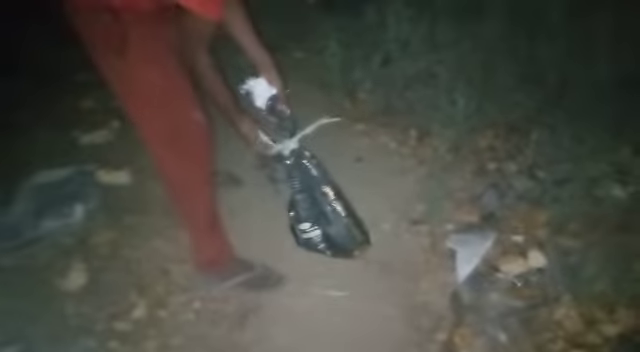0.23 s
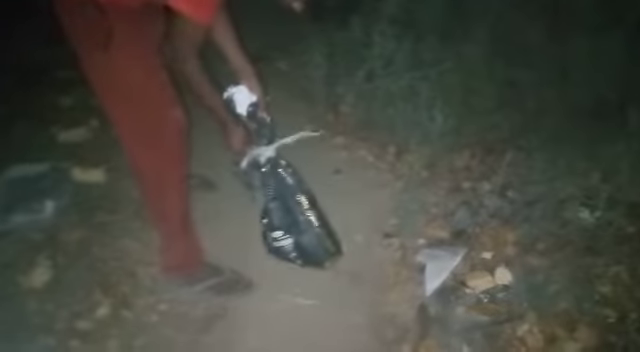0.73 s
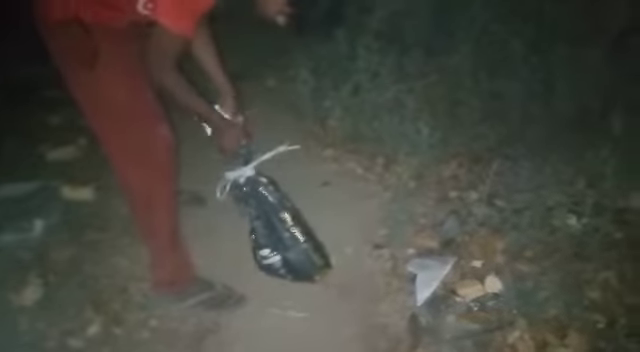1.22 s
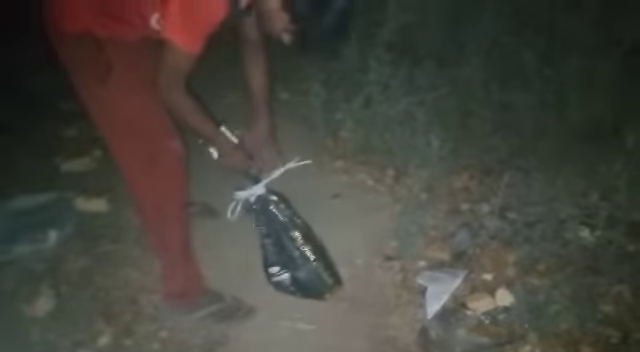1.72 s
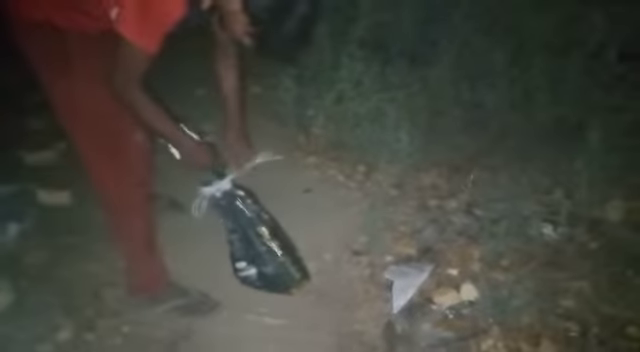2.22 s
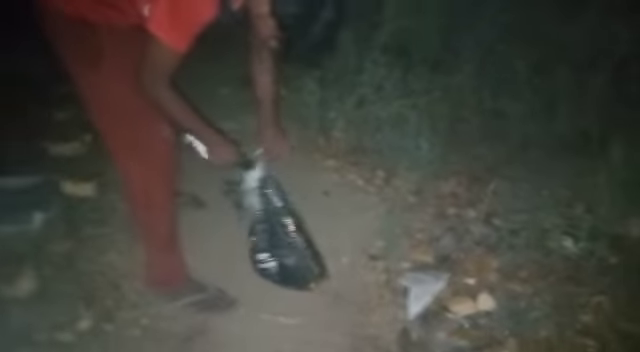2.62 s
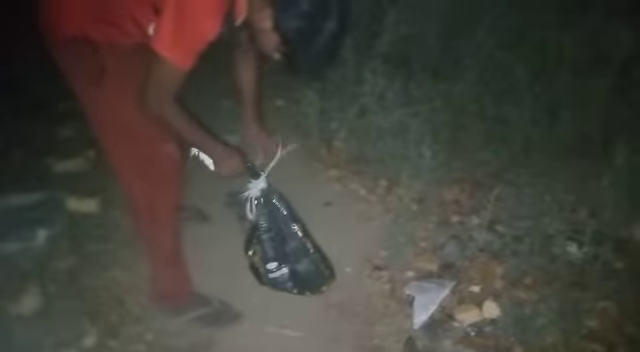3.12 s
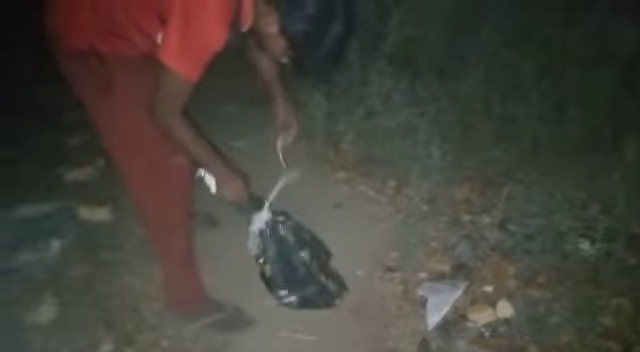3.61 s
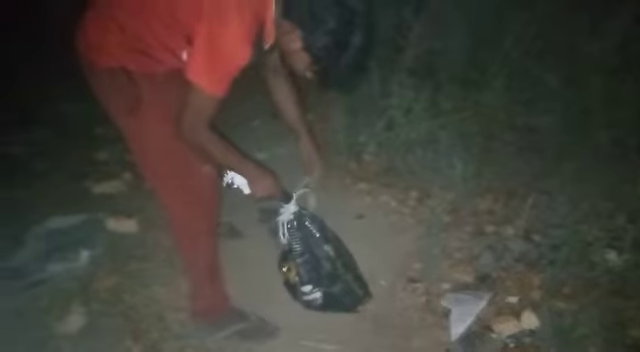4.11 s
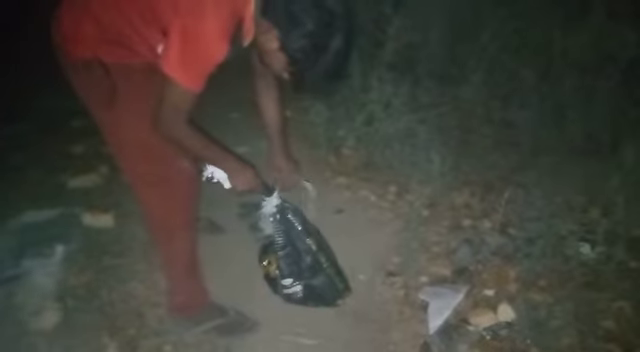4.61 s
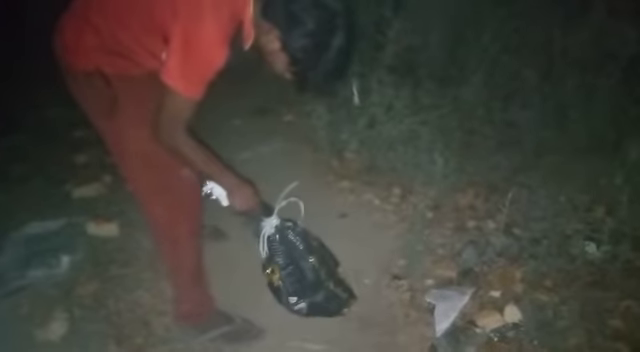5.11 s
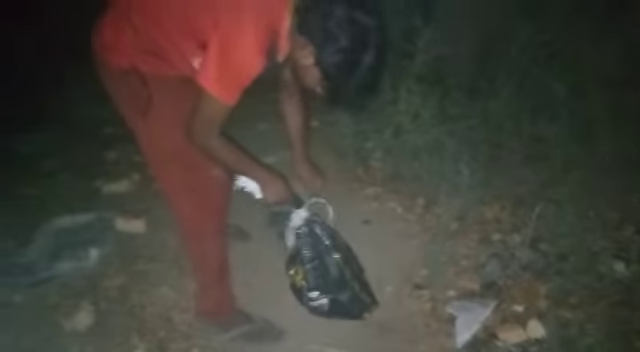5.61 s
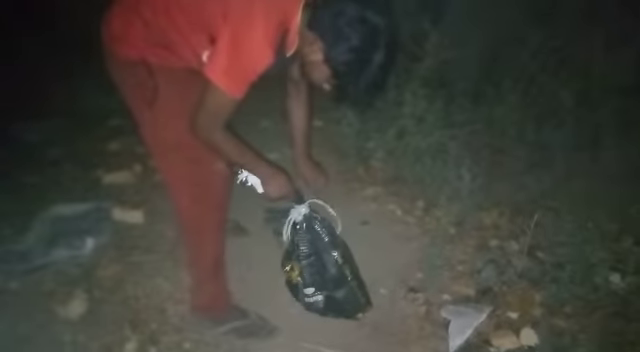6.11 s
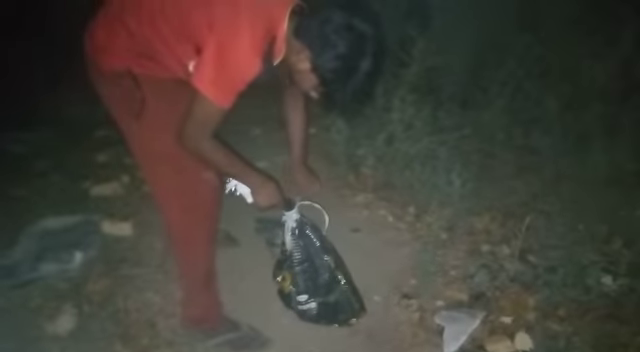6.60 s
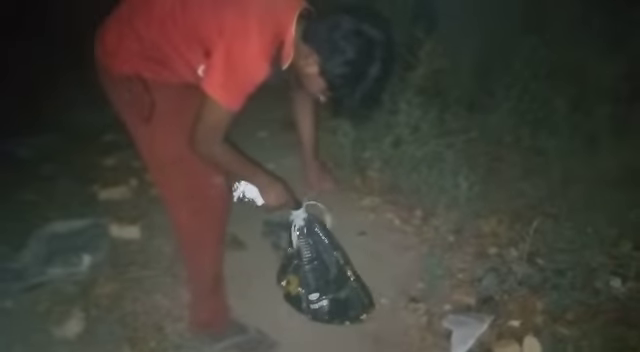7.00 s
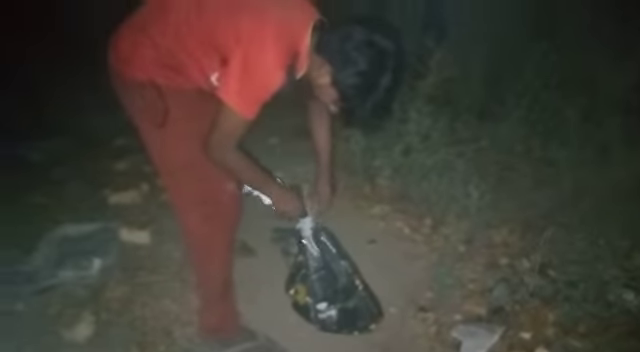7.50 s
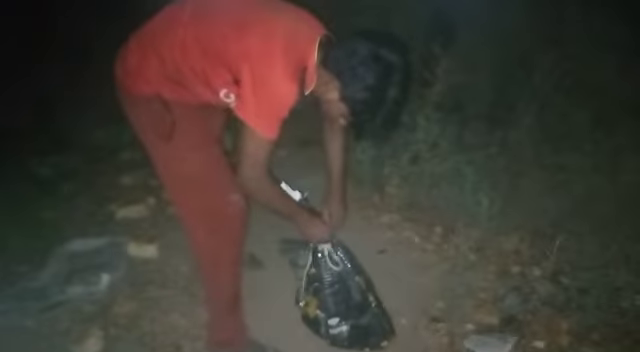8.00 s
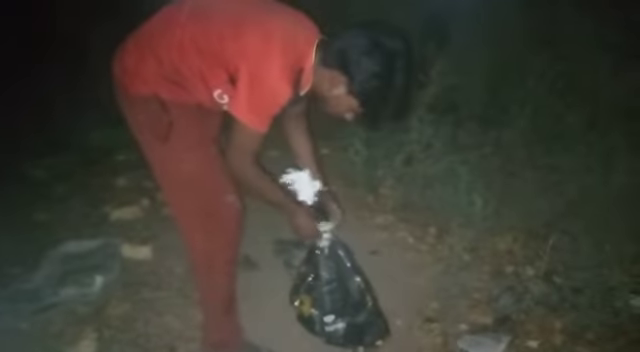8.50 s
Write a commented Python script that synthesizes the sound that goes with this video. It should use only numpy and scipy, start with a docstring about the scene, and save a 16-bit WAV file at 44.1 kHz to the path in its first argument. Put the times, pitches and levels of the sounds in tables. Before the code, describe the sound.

Crickets chirp and trill in high tones throughout, outdoors at night, over a faint distant rumble. Close to the microphone, hands lightly crinkle a plastic bag, then twist and tie it harder, with sharp snaps and soft knocks from the contents. A single tap thuds on the microphone. The bag goes nearly quiet, leaving the insects, before the crinkling returns near the end.

```python
"""Night in a yard: crickets chip, sweep and trill with their wings throughout, over a far low rumble.
Close by, hands start on a plastic bag, and its film crinkles in short, light moves.
From 2.6 s they twist and tie it harder: folds snap, the load slides and knocks, and near 4 s
a tap on the microphone thuds. After 5 s the bag all but rests and the crickets come forward;
from 6.7 s the crinkling and snapping return until the end."""
import sys
import numpy as np
from scipy import signal
from scipy.fft import rfft, irfft
from scipy.io import wavfile
from scipy.ndimage import uniform_filter1d

SR = 44100
rng = np.random.default_rng(int(sys.argv[2]) if len(sys.argv) > 2 else 0)


def put_to_file(sound):
    """Save the sound as 16-bit audio at rate SR, in the file named by the first command-line argument."""
    columns = np.atleast_2d(sound).T  # one column per channel
    safe = np.clip(columns, -1, 1)
    whole_steps = np.round(safe * 32767)
    wavfile.write(sys.argv[1], SR, whole_steps.astype(np.int16))


N = 386316

# Moves of the hands on the film. Each row: start in seconds, length in seconds,
# level of the folds in dB, fine crackle against the folds in dB.
MOVES = [(-0.09, 0.14, -40, -23), (0.09, 0.061, -57.5, -3), (0.286, 0.076, -66, -3), (0.385, 0.1, -57, -4),
         (0.545, 0.089, -59, -3), (0.649, 0.14, -58.5, -5), (1.125, 0.074, -60, 1),
         (1.308, 0.096, -51.5, -11), (1.417, 0.043, -53, -16), (1.453, 0.12, -54, -20),
         (2.565, .148, -55, -7), (2.736, 0.14, -54, -16), (3.059, 0.063, -49.5, -9.5),
         (3.416, 0.063, -63, -4), (3.505, 0.17, -49.5, -7), (3.634, 0.16, -54, -18), (3.846, 0.12, -58, -3),
         (4.253, 0.02, -58, -18), (4.607, 0.012, -51.5, 3), (4.77, 0.087, -51, -10),
         (4.848, 0.064, -37, -7.5), (4.944, 0.031, -51.5, -15), (5.42, 0.079, -65, -9),
         (6.668, 0.25, -63.5, -5), (7.046, 0.053, -57.5, -8), (7.3, .06, -65, -8), (7.386, 0.077, -56, -6),
         (7.54, .1, -60.5, -12), (7.928, 0.1, -51.5, -9), (8.06, .15, -62, -8), (8.239, 0.13, -44, -8),
         (8.363, 0.16, -59, -6), (8.512, 0.22, -53, -10)]


def crinkle():
    """Thousands of tiny buckles in the film: fine crackle on top, broad folds below, stray ticks."""
    # Tone of the crackle and of the folds. Each row: frequency in Hz, relative level in dB.
    crackle_eq = [(6000, -38), (9000, 16.5), (11700, 9.5), (13600, -6), (15000, 10.5), (15900, 3)]
    folds_eq = [(400, -21), (900, -9), (1700, -8.5), (2200, -15), (3300, -7), (4300, -0.5), (5600, 7),
                (6800, 1), (8200, -15.5)]
    follow = 0.57  # below 1, so sparks and ticks stand out most in gentle moves
    buckles = []
    for _ in range(2):
        dense = evened(clicks(12000, 1.3)) * amp(2 * drift(70))
        buckles.append(dense + .35 * evened(clicks(300, 2.2)))
    grip = evened(amp(2.5 * np.tanh(drift(45))))  # the grip slips and catches
    sparks = evened(clicks(78, 2.5))
    fold_gain = handling(MOVES)
    crackle_gain = handling([(start, length, db + crisp_db) for start, length, db, crisp_db in MOVES])
    # each small panel of film rings at its own pitch for a moment
    crackle = patchy(coloured(buckles[0] + .5 * buckles[1], crackle_eq), 4.8, size=256)
    folds = patchy(coloured(buckles[1], folds_eq), 4.04, size=512)
    out = grip * (crackle * crackle_gain + folds * fold_gain)
    out += amp(-36) * coloured(sparks, crackle_eq) * crackle_gain ** follow
    for hz in (2300, 4300, 6300):
        ticks = clicks(40, 2.8) * fold_gain ** follow
        out += amp(-27) * signal.oaconvolve(ticks, snap(hz))[:N]
    return out


def snaps():
    """Accents in the film: folds flip over and lone buckles spit bright clicks."""
    # Flipping folds. Each row: start in seconds, peak in dB, pitch of the fold in Hz.
    flips = [(0.6789, -32, 5600), (2.0143, -35, 5960), (2.6002, -38, 5240), (2.6232, -29.5, 5600),
             (2.6954, -32, 5200), (2.754, -22, 4200), (3.6794, -29, 6160), (3.699, -22.5, 4550),
             (3.741, -33, 5200), (4.047, -33.5, 4000), (4.9445, -25, 5000), (5.051, -36, 4540),
             (6.678, -41, 4340), (6.781, -34, 4700), (6.8253, -47, 2300), (6.9144, -37, 4500),
             (7.187, -48, 2000), (7.33, -44, 5000), (7.599, -29, 5240), (7.7742, -45, 4800),
             (7.985, -36, 5060), (8.222, -35, 3620), (8.2641, -30, 3630), (8.605, -37, 4530)]
    # The brightest lone buckles. Each row: start in seconds, peak in dB.
    sparks = [(0.1346, -40), (0.3122, -48), (0.4369, -37), (0.4594, -42), (0.5921, -36), (0.7053, -43),
              (1.0106, -31), (3.9509, -33), (4.9711, -38), (8.1768, -45)]
    out = np.zeros(N)
    for start, db, hz in flips:
        add(out, start, amp(db) * snap(hz))
    for start, db in sparks:
        add(out, start, amp(db) * snap(10000, edge_db=8))
    return out


def snap(hz, edge_db=-40):
    """A few buckles in quick succession ring a fold and add a thin treble edge; peak 1."""
    t = np.arange(600) / SR
    burst = rng.standard_normal((2, len(t))) * np.exp(-t / 0.0018)
    edge = np.pad(np.diff(burst[1], 2), (0, len(t)))
    fold = np.convolve(np.diff(burst[0]), ring(hz, 0.44 * hz, .0001)[:len(t)])
    sound = fold + amp(edge_db) * edge
    return sound / abs(sound).max()


def squeak():
    """Film stretched tight gives a faint, unsteady rising tone."""
    # In order: start and length in seconds, pitch and fall in Hz (negative rises), level in dB.
    stretch = (3.46, .16, 1030, -90, -62)
    start, length, hz, fall_hz, db = stretch
    out = np.zeros(N)
    tone = stroke(hz, length, fall_hz, soft=1.0)
    flutter = 1 + 0.7 * drift(56)[:len(tone)]
    add(out, start, amp(db) * tone * flutter)
    return out


def load():
    """Uneven slips and single knocks ring the soft, low body of the bag; each slip catches one mode."""
    # Modes of the load. Each row: pitch in Hz, relative damping, weight in the slips in dB.
    modes = [(323, 143, 9.5), (830, 198, 9), (1060, 280, 2.5), (1410, 250, 6.5), (1760, 500, -3.5)]
    # The load slides inside the bag. Each row: start in seconds, length in seconds, level in dB.
    slides = [(-0.09, 0.16, -62), (1.407, 0.17, -65.5), (2.74, 0.25, -62), (3.061, 0.089, -59.5),
              (3.639, 0.13, -43), (4.252, 0.027, -56), (4.93, 0.05, -44), (5.013, 0.1, -64),
              (5.43, 0.04, -57.5), (6.733, 0.16, -60), (8.236, 0.16, -61), (8.6, 0.12, -60)]
    # The load knocks. Each row: start in seconds, peak in dB, pitch the contact favours in Hz.
    knocks = [(2.753, -40, 900), (2.769, -34.5, 1080), (2.842, -41, 327), (2.923, -38, 970),
              (2.986, -43, 740), (3.699, -28.5, 950), (3.721, -31.5, 385), (3.887, -37, 323),
              (3.912, -35, 850), (4.05, -34.5, 1010), (4.259, -43, 1350), (4.961, -39, 920),
              (4.99, -38.5, 804), (6.848, -45, 910), (6.875, -46, 340), (8.7, -45, 870)]
    stir_db, contact_octaves = -23.5, 0.25
    slips = np.zeros(N)
    for hz, damping, db in modes:
        slips += signal.oaconvolve(clicks(190, 3.4), amp(db) * ring(hz, 0.7 * damping, 0.0008))[:N]
    stir = amp(stir_db) * handling(MOVES)  # every move of the film also stirs the load a little
    out = evened(slips) * (handling(slides) + stir)
    for start, db, contact_hz in knocks:
        knock = 0
        for hz, damping, _ in modes:
            weight = np.exp(-(np.log2(hz / contact_hz) / contact_octaves) ** 2)
            knock += weight * ring(hz, 0.39 * damping, 0.00024)
        add(out, start, amp(db) * knock / abs(knock).max())
    return out


def handling(moves):
    """Envelope of a rustle layer: each move swells and fades, then the bag keeps settling faintly."""
    gain = np.zeros(N)
    for start, seconds, db, *_ in moves:
        samples = round((seconds + 0.05) * SR)
        swell = signal.windows.tukey(samples, min(.09 * SR / samples, 1))
        add(gain, start - .02, amp(db) * swell)
    decay = np.exp(-1 / (.14 * SR))
    return gain + 0.16 * signal.lfilter([1 - decay], [1, -decay], gain)


def thud():
    """A tap on the microphone body: a quick inward kick, then one slow swing back."""
    # In order: start in seconds, level in dB, pitch of the swing in Hz.
    tap = (4.0645, -21.5, 234)
    start, db, hz = tap
    out, t = np.zeros(N), np.arange(200) / SR
    kick = -np.exp(-((t - .0011) / 0.00014) ** 2)
    add(out, start, amp(db) * kick)
    add(out, start + 0.0014, amp(db) * ring(hz, 230, .0001))
    return out


def high_crickets():
    """Bright chips, one wing stroke each: a near cricket, a slower far one and accents of the chorus."""
    # Bouts of the near and the far cricket. Each row: first and last stroke in seconds.
    near_bouts = [(0.277, 1.321), (1.654, 1.988), (2.312, 3.013), (3.343, 3.343), (3.666, 5.75),
                  (6.092, 8.513)]
    far_bouts = [(.353, 2.427), (4.058, 6.035), (6.41, 7.978)]
    # Level curve of the near cricket. Each row: time in seconds, peak in dB.
    near_levels = [(0.28, -34.5), (1.32, -31), (2.3, -34.5), (3.67, -33.5), (4.01, -29.5), (5.06, -29.5),
                   (5.75, -31.5), (8.0, -33), (8.51, -33.5)]
    # Loudest strokes of the high chorus. Each row: centre in seconds, peak in dB, middle pitch in Hz.
    accents = [(0.124, -37, 9150), (0.441, -39.5, 9170), (0.77, -38, 9230), (1.128, -38, 8700),
               (5.862, -37, 9150), (7.853, -35, 8500), (7.96, -41, 8900), (8.315, -34, 8500),
               (8.344, -40, 8700)]
    near_chip = stroke(8660, 0.027, 110, bend_hz=1070, soft=1.0)
    far_chip = stroke(8000, .03, 250, bend_hz=600)
    notes = []
    for bout in near_bouts:
        notes += [(s, np.interp(s, *np.transpose(near_levels)), near_chip) for s in beats(*bout, .347)]
    for bout in far_bouts:
        notes += [(s, -58, far_chip) for s in beats(*bout, .4)]
    notes += [(s, db, stroke(hz, 0.02, 290, soft=1.5)) for s, db, hz in accents]
    return place_strokes(notes)


def low_crickets():
    """Lower singers: single falling wing strokes and swelling phrases, some closed by a quick trill."""
    # Single strokes of neighbours. Each row: centre in seconds, level in dB, middle pitch in Hz.
    sweeps = [(0.532, -43.5, 5750), (4.209, -51, 6000), (5.886, -52, 5930), (6.023, -52.5, 5500),
              (6.084, -54, 5500), (6.728, -50, 5960), (7.218, -54, 5500), (7.66, -51, 5870),
              (8.701, -50, 5900), (5.01, -55, 5600), (5.1, -66, 5800), (5.33, -55, 5750)]
    # Phrases. Each row: loudest stroke in seconds, its level in dB, gap before it in seconds.
    phrases = [(0.475, -41.5, 0.079), (1.676, -43.5, 0.063), (2.972, -42.5, 0.07), (4.346, -45.5, 0.065),
               (5.749, -43, 0.077), (7.15, -42.5, 0.064), (8.364, -45, 0.081)]
    # Closing trills. Each row: first stroke in seconds, length in seconds, final level in dB.
    closing_trills = [(1.77, .173, -54), (3.146, 0.23, -49.5), (4.463, .252, -53.5), (7.267, 0.26, -51)]
    trill_swell_db, trill_per_s = 4, 42.5
    clean = [(s, db, stroke(hz, 0.055, 890, soft=1.0, late=2.0)) for s, db, hz in sweeps]
    clean += [note for row in phrases for note in phrase(*row)]
    rasp = 1 + .3 * drift(300)  # leaves and distance roughen the song
    notes = [(s, db, sound * rasp[round(s * SR):][:len(sound)]) for s, db, sound in clean]
    for first, length, final_db in closing_trills:
        for s in beats(first, first + length, 1 / trill_per_s):
            db = final_db - trill_swell_db * (1 - (s - first) / length)
            notes.append((s, db, stroke(5450, .021, 320)))
    return place_strokes(notes)


def phrase(last_s, last_db, gap_s):
    """Six wing strokes, each louder, longer, higher, later in coming and falling farther."""
    gap_ratio = 0.94
    notes = []
    for back in range(6):  # counted back from the last stroke
        centre = last_s - gap_s * (1 - gap_ratio ** back) / (1 - gap_ratio)
        sound = stroke(5500 - 17 * back, .048 * 0.98 ** back, 860 * .7 ** back, soft=1.2, late=1.1)
        notes.append((centre, last_db - 1.5 * back ** 2, sound))
    return notes


def stroke(hz, length_s, fall_hz, bend_hz=0., soft=2.2, late=0.98):
    """A wing stroke slides down as the scraper slows; bend_hz drops its end, late delays its peak."""
    progress = np.arange(round(length_s * SR)) / (length_s * SR)
    pitch = hz + fall_hz * (.5 ** (1 / late) - progress) - bend_hz * progress ** 4.13
    envelope = np.sin(np.pi * progress ** late) ** soft
    return envelope * np.sin(2 * np.pi * np.cumsum(pitch) / SR)


def trills():
    """Steady singers: a tone roughened by distance and neighbours, chopped by each wing stroke."""
    # Unbroken trills. Each row: pitch in Hz, strokes per second, rms level in dB, blur in Hz.
    singers = [(3015, 58.7, -67, 20), (3080, 65, -68.5, 40), (2993, 63, -63.5, 150),
               (8500, 78.0, -56.5, 160)]
    out, t = np.zeros(N), np.arange(N) / SR
    for hz, per_s, db, blur_hz in singers:
        beat = np.cumsum(per_s * (1 + 0.0062 * drift(1.51))) / SR + rng.random()
        progress = beat % 1
        cycles = hz * t + 72 / per_s * progress * (1 - progress)  # the pitch sags through each stroke
        blur = 0.6 + drift(blur_hz) + 1j * drift(blur_hz)
        tone = (blur * np.exp(2j * np.pi * cycles)).real
        out += amp(db) * evened(tone * abs(np.sin(np.pi * beat)) ** 1.1)
    return out


def crowds():
    """Many far crickets stroke at random and in loose waves; faint low tones waver beneath them."""
    # Three cricket bands, then the low tones. Each row: lowest pitch, highest pitch and fall in Hz,
    # stroke length in seconds, strokes per second, level spread in dB, rms level in dB.
    bands = [(8500, 9330, 262, 0.02, 1100, 5, -50.5), (5370, 5600, 800, 0.038, 200, 3.5, -65),
             (6100, 7100, 530, 0.0177, 690, 12, -65.5)]
    low_tones = (679.5, 1000, 50, 0.04, 16, 3.0, -75.5)
    out = np.zeros(N)
    for low_hz, high_hz, fall_hz, length, per_s, spread_db, db in bands + [low_tones]:
        pitches = np.linspace(low_hz, high_hz, 10)
        triggers = clicks(per_s, spread_db) * amp(1.9 * drift(9))
        singer = rng.integers(0, len(pitches), N)
        crowd = np.zeros(N)
        for k, hz in enumerate(pitches):
            crowd += signal.oaconvolve(triggers * (singer == k), stroke(hz, length, fall_hz))[:N]
        out += amp(db) * evened(crowd)
    return out


def air():
    """A bed of far rumble and night hiss."""
    # Tone of the bed. Each row: frequency in Hz, relative level in dB.
    air_eq = [(20, -26), (45, -8.5), (75, 3), (130, 1.5), (200, -5.5), (330, -28), (560, -28), (850, -28),
              (1500, -37.5), (3600, -45), (4900, -45), (6500, -21.5), (7800, -27.5), (10200, -38),
              (13500, -63), (15500, -37)]
    return amp(-49) * patchy(coloured(rng.standard_normal(N), air_eq), 2.91, size=1024)


def yard(x, t60):
    """Scattered echoes from ground and bushes, dying by 60 dB in t60 seconds."""
    t = np.arange(12000) / SR
    taps = rng.standard_normal(len(t)) * (t > .004) * amp(-60 * t / t60)
    return signal.oaconvolve(x, taps / np.linalg.norm(taps))[:N]


def amp(db):
    """Decibels to gain."""
    return 10 ** (np.asarray(db) / 20)


def evened(x):
    """Scales x to rms 1."""
    return x / np.sqrt(np.mean(x ** 2) + 1e-20)


def add(mix, start_s, sound):
    """Mixes a sound in, trimming what overhangs either end."""
    at = round(start_s * SR)
    part = mix[max(at, 0):][:len(sound) + min(at, 0)]
    part += sound[max(-at, 0):][:len(part)]


def place_strokes(notes):
    """Lays out (seconds, dB, sound) notes, each with its energy centred on its time."""
    out = np.zeros(N)
    for s, db, sound in notes:
        centre = np.average(np.arange(len(sound)), weights=sound ** 2) / SR
        add(out, s - centre, amp(db) * sound)
    return out


def beats(first, last, gap):
    """Evenly spaced moments from first to last, about gap seconds apart."""
    return np.linspace(first, last, round((last - first) / gap) + 1)


def clicks(per_s, spread_db):
    """A random train of clicks, a few of them large."""
    sizes = amp(spread_db * np.minimum(rng.exponential(1, N), 4))
    return sizes * (rng.random(N) < per_s / SR) * rng.choice([-1, 1], N)


def ring(hz, width_hz, rise_s):
    """A damped vibration with a soft start, peak 1."""
    t = np.arange(1500) / SR
    sound = np.sin(2 * np.pi * hz * t) * np.exp(-np.pi * width_hz * t) * (1 - np.exp(-t / rise_s))
    return sound / abs(sound).max()


def drift(per_s):
    """A random wander through per_s values a second, at rms 1."""
    steps = rng.standard_normal(round(N / SR * 400) + 2)
    return evened(np.interp(np.arange(N) / SR * per_s, np.arange(len(steps)), steps))


def coloured(x, eq):
    """Shapes x with a curve of (Hz, dB) points, at rms 1."""
    points_hz, points_db = np.transpose(eq)
    hz = np.fft.rfftfreq(N, 1 / SR)
    gain = amp(np.interp(np.log(hz + 1), np.log(points_hz), points_db))
    return evened(irfft(rfft(x) * gain, N))


def patchy(x, patch_db, size):
    """Lifts and dips random patches of time and pitch, at rms 1."""
    spectra = signal.stft(x, SR, nperseg=size)[2]
    across_pitch = uniform_filter1d(rng.standard_normal(spectra.shape), 7, 0)
    patches = evened(uniform_filter1d(across_pitch, 12, 1))
    return evened(signal.istft(spectra * amp(patch_db * patches), SR, nperseg=size)[1][:N])


def scene():
    """Mono mix: bag and near crickets with short echoes, far trills with longer ones, over the bed."""
    near = high_crickets() + low_crickets()
    bag = crinkle() + snaps() + squeak() + load()
    far = trills()
    insects = near + amp(-17.5) * yard(near, t60=0.097)
    insects += far + amp(-13) * yard(far, t60=0.77) + crowds()
    return (insects + bag + amp(-11) * yard(bag, t60=0.069) + air() + thud())[None]


def record(dry):
    """The small microphone loses the deepest bass; a steep low-pass cuts the highest treble."""
    low_cut_hz, high_cut_hz = 45, 15890
    heard = signal.sosfilt(signal.butter(2, low_cut_hz, "highpass", fs=SR, output="sos"), dry)
    low_pass = signal.firwin(2047, high_cut_hz, window=("kaiser", 11), fs=SR)
    return signal.oaconvolve(heard, low_pass[None], "same")


dry = scene()
out = record(dry)
put_to_file(out)
```